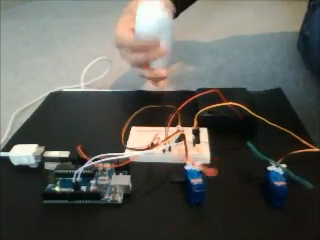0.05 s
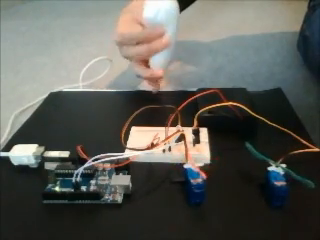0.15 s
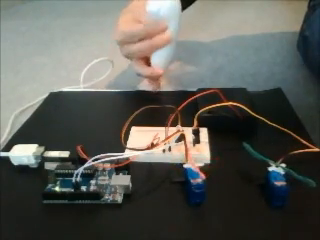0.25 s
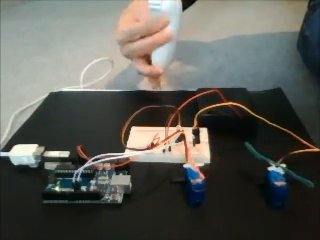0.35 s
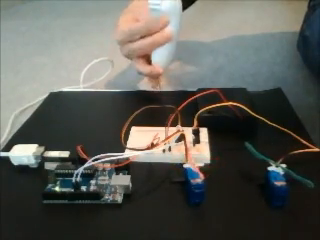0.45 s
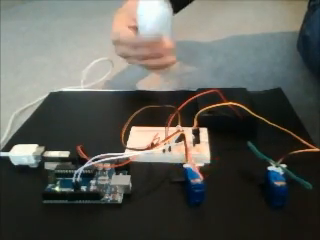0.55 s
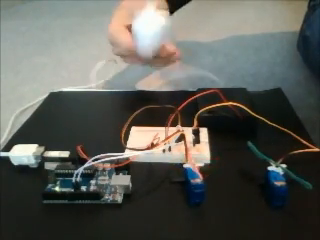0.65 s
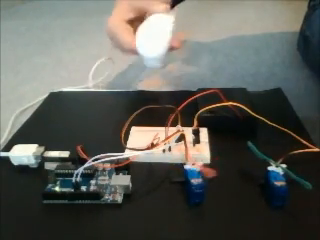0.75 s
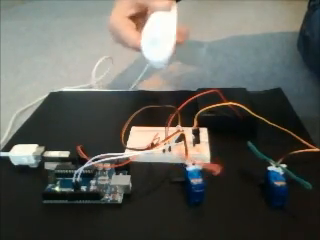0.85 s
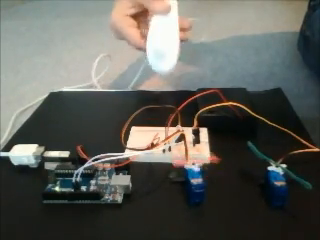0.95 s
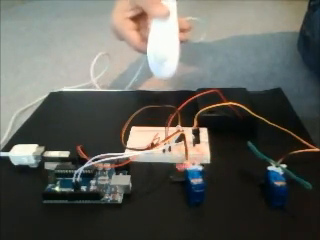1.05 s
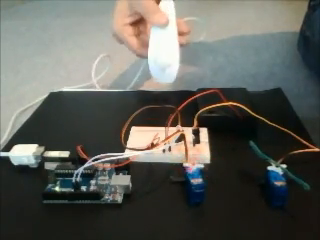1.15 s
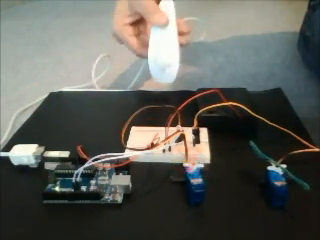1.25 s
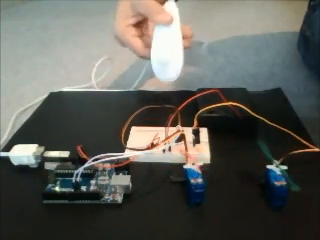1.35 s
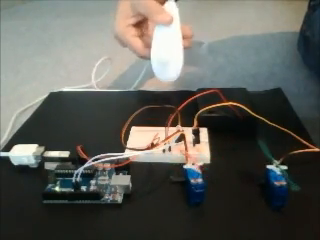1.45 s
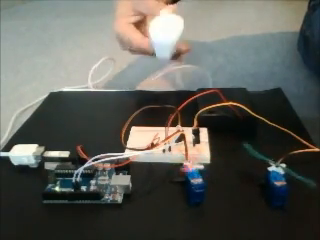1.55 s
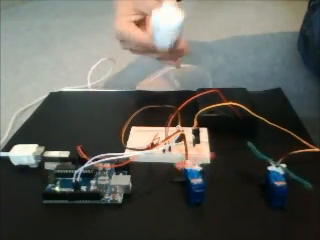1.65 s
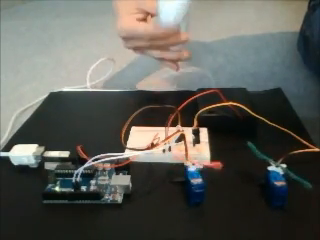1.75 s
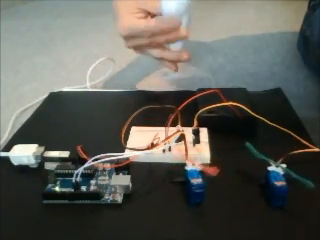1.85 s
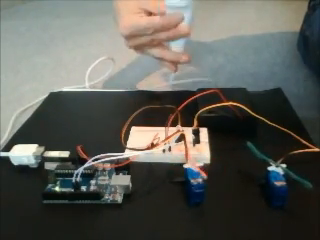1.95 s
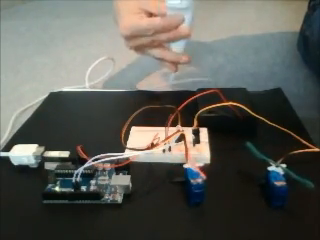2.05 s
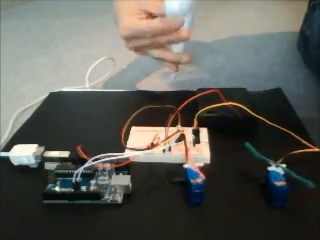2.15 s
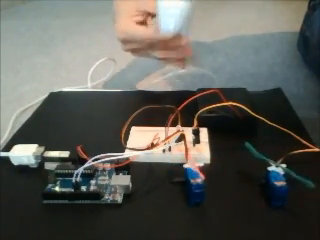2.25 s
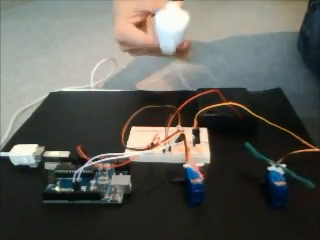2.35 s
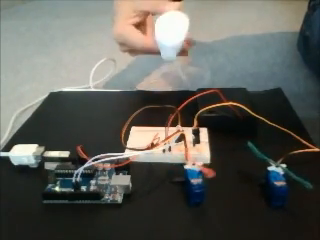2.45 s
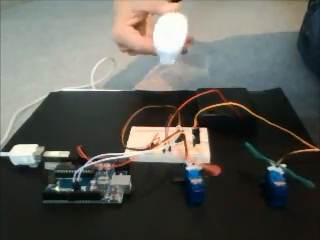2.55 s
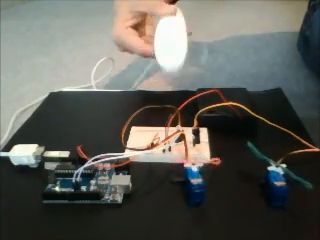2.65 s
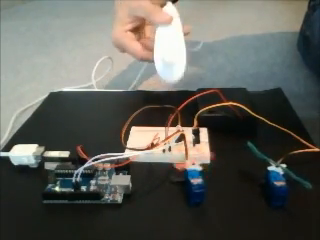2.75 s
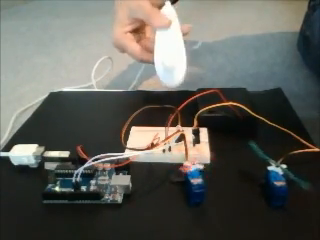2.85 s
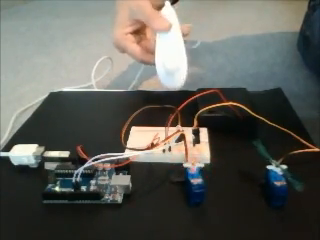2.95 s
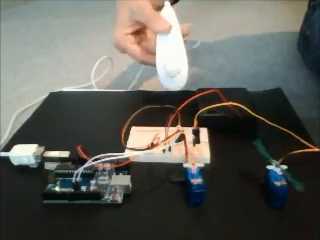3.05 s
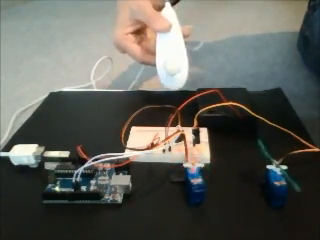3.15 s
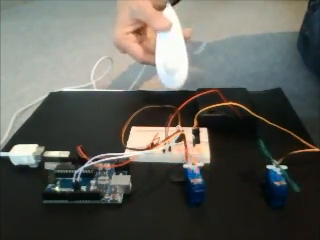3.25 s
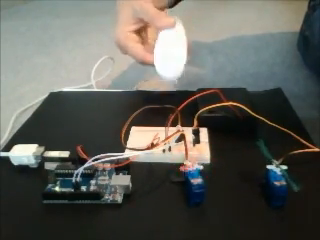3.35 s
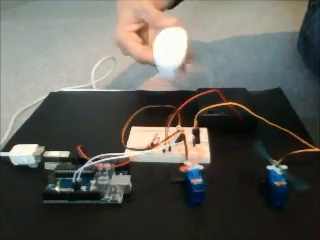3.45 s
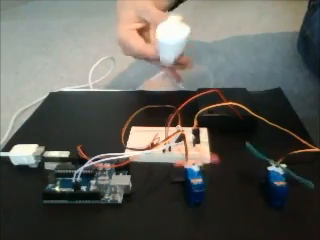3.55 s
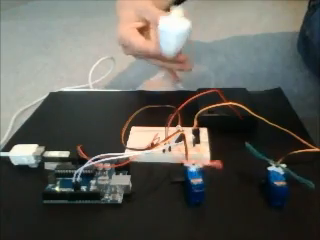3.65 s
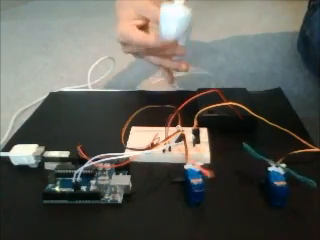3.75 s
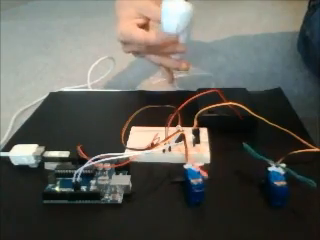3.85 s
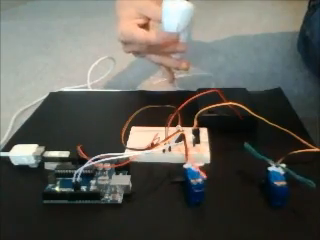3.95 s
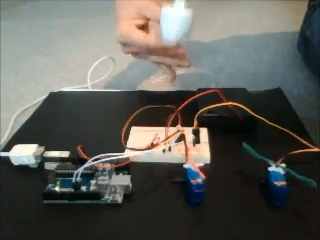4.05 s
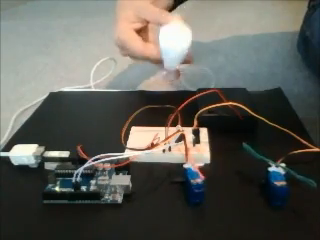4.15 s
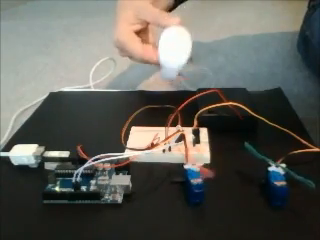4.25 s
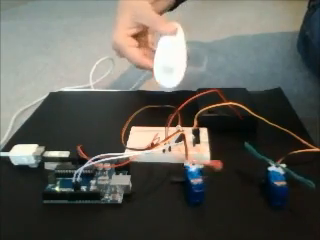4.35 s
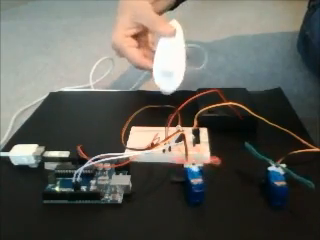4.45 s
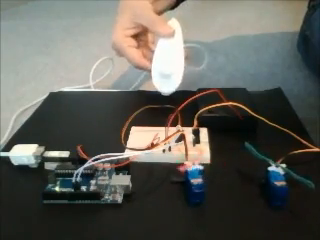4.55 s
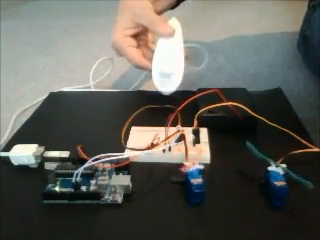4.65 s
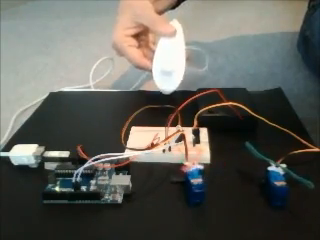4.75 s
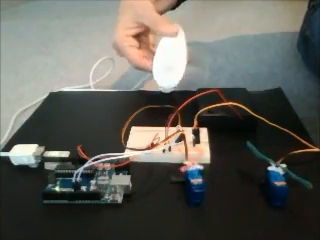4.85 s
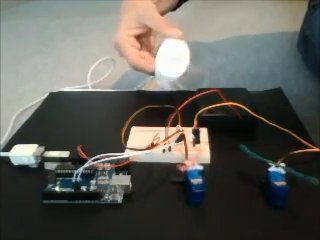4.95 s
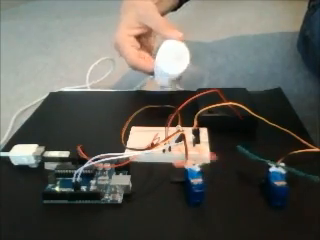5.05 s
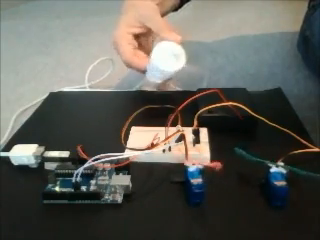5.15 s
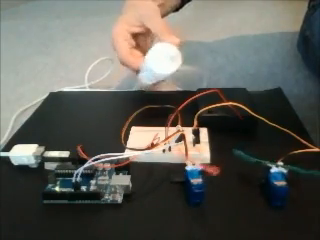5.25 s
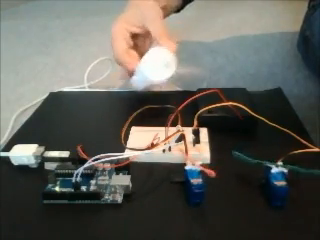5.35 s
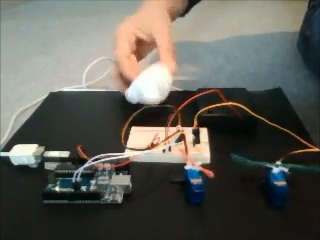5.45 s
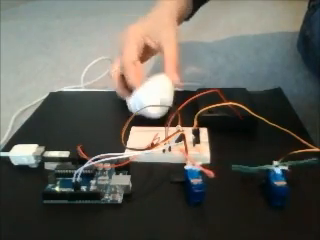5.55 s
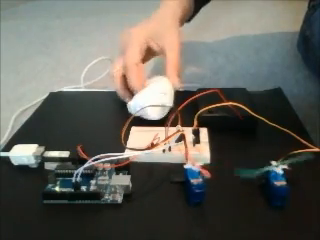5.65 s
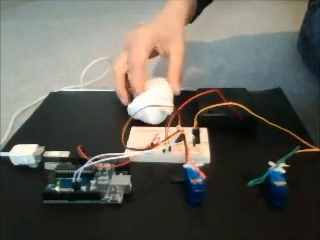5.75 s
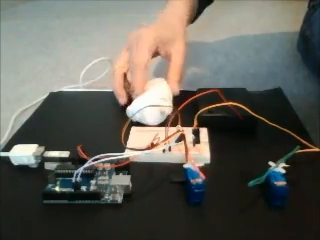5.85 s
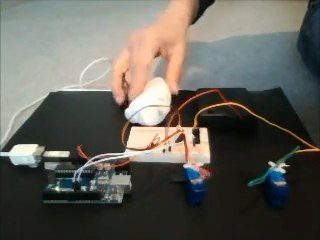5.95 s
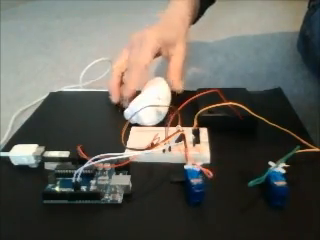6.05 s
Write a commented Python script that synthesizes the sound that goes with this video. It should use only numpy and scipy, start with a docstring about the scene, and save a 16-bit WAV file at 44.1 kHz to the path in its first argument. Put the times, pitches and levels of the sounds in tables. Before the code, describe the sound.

Close, high, buzzy whirs of a little servo swinging to and fro, with brief gear rattles and dry twitches from another.

```python
"""A hobby servo swings to and fro on a workbench: its gear teeth whine, scrape and knock, ringing the
plastic case near 7 kHz. The gears clack as they take up slack, growl near a stall and jolt under load.
A second servo twitches with a dry rasp, and a shaft squeaks faintly as it creeps to rest.
At rest both tick with the 50 Hz pulses of a hand-held controller.
All is heard in a small room, close to a narrow-band mono microphone."""
import sys
import numpy as np
from scipy import signal
from scipy.fft import rfft, irfft, next_fast_len
from scipy.io import wavfile
from scipy.ndimage import uniform_filter1d

SR = 44100
rng = np.random.default_rng(int(sys.argv[2]) if len(sys.argv) > 2 else 0)


def dump(signal):
    """Clip the signal to [-1, 1] and save it as 16-bit WAV at the path in sys.argv[1]."""
    limited = np.clip(np.atleast_2d(signal).T, -1, 1)
    pcm = np.round(limited * 32767).astype(np.int16)
    wavfile.write(sys.argv[1], SR, pcm)


N = 268569
TIME = np.arange(N) / SR
FULL_SPEED_HZ = 780  # tooth rate of the swinging servo

# swings of the first servo: start/s, drive time/s, run-down/s, top tooth rate/Hz, level/dB, gear load/dB
SWINGS = [ (-.054, 0.092, .05, 777, 0.5, 3), (.693, 0.31, 0.12, 774, 0.5, -0.5),
          (1.046, .03, .041, 660.3, 2, 1.5), (1.11, 0.033, .095, 686.5, 0, -1.1),
          (1.19, 0.069, 0.033, 551.3, -0.5, -0.5), (1.404, 0.047, 0.093, 588.3, 0, 1),
          (1.472, 0.36, 0.074, 778.2, -.5, 7), (2.345, .06, 0.095, 673, 1.5, -2.8),
          (2.432, 0.035, 0.099, 760, 1.3, -1), (2.491, 0.062, 0.092, 761.7, .5, -1),
          (2.567, .014, 0.093, 682.4, 0.8, 2.5), (2.652, 0.19, 0.066, 756, 1.2, -0.3),
          (2.862, .014, 0.061, 399.2, 1, 4.5), (3.006, .057, 0.06, 691.8, -2, 5),
          (3.084, 0.027, 0.091, 684.3, 2, -2), (3.153, 0.057, 0.049, 551, 0, -1),
          (3.223, .12, 0.063, 760, -0.66, 5.5), (3.378, 0.039, .087, 498.1, -0.5, 0),
          (3.437, .3, .046, 776.8, -0.62, 6.5), (4.175, .192, 0.065, 765.3, 0.8, -1.2),
          (4.391, 0.13, 0.064, 759.7, 0.65, -1.4), (4.586, 0.059, 0.081, 749, 1.1, -2),
          (4.684, .058, .068, 756, -0.5, 5.5), (4.815, .03, 0.048, 638.4, 2.2, -1.5),
          (4.894, .19, .024, 778, -.8, 8), (5.114, .096, .062, 782.3, -0.35, 6),
          (5.558, .034, 0.053, 618.7, 2, 2), (5.913, 0.059, 0.03, 536, -2.1, -1),
          (6.059, 0.022, 0.044, 649, 2, -4.5), ]
# resonances of the plastic case: f/Hz, width/Hz, level/dB
CASE_MODES = [(6100, 37, -22), (6616, 230, -4.5), (6714, 92, 1), (6917, 205, -1.5), (7144, 51, 1.5),
              (7340, 390, -3.5)]
# resonances of the gear train: f/Hz, width/Hz, level/dB
GEAR_MODES = [(920, 140, -18.5), (2105, 120, -12), (2760, 210, -8.5), (3906, 27, 3.5), (4420, 67, -1.5),
              (4630, 280, 10.5), (5434, 42, 10.5), (5480, 50, -3.5), (5790, 210, 2)]


def amp(db):
    """Decibels to gain."""
    return 10 ** (np.asarray(db) / 20)


def unit(x):
    """Scales to rms 1."""
    return x / np.sqrt(np.mean(x ** 2) + 1e-20)


def steady(x):
    """Scales to rms 1 over every 25 ms, keeping the fast flutter."""
    return x / np.sqrt(abs(uniform_filter1d(x ** 2, size=1100)) + 1e-12)


def curve_at(points, hz):
    """Reads a curve of (f/Hz, value) points on a log-frequency axis."""
    f, value = np.transpose(points)
    return np.interp(np.log(hz + 1), np.log(f), value)


def colour(x, points):
    """Equalises x with a curve of (f/Hz, level/dB) points."""
    size = next_fast_len(N + 8192)
    gain = amp(curve_at(points, np.fft.rfftfreq(size, 1 / SR)))
    return irfft(rfft(x, size) * gain, size)[:N]


def wander(hz):
    """Smooth random drift of rms 1, up to about this rate."""
    f = np.fft.rfftfreq(N, 1 / SR)[:4000]
    spectrum = rfft(rng.standard_normal(8000))[:4000] / (1 + (f / hz) ** 4)
    return unit(irfft(spectrum, next_fast_len(N))[:N])


def ring(x, modes):
    """Passes x through parallel resonances of alternating polarity."""
    return sum((-1) ** k * amp(db) * signal.lfilter(*signal.iirpeak(hz, hz / width, SR), x)
               for k, (hz, width, db) in enumerate(modes))


def after(start, length_s=0.25):
    """The samples that follow a start time, and the time since that start."""
    at = np.searchsorted(TIME, start)
    span = slice(at, at + int(length_s * SR))
    return span, TIME[span] - start


def impacts(cycles, spread_db, jitter_s):
    """One click a cycle, each of its own size and a little early or late."""
    at = np.flatnonzero(np.diff(np.floor(cycles)) > 0)
    size, late = rng.standard_normal((8000, 2))[:len(at)].T
    exact = at + (1 - cycles[at] % 1) / (cycles[at + 1] - cycles[at]) + late * jitter_s * SR
    taps = np.round(exact)[:, None].astype(int) + np.arange(-4, 5)
    clicks = amp(spread_db * np.clip(size, -2, 2))[:, None] * np.sinc(taps - exact[:, None])
    return np.bincount(np.clip(taps, 0, N - 1).ravel(), clicks.ravel(), N)


def scrape(cycles, spread_db, duty):
    """Each cycle sets off a burst of sliding friction that decays over a share (duty) of the cycle."""
    size = amp(spread_db * np.clip(rng.standard_normal(8000), -2, 1.5))
    envelope = size[np.floor(cycles).astype(int) % len(size)] * np.exp(-(cycles % 1) / duty)
    return unit(envelope * rng.standard_normal(N))


def motor():
    """Tooth rate, surge, level and load: the motor spins up while driven, then brakes evenly to rest."""
    spin_up_s, surge_peak_s = 0.0118, 0.016
    hz, surge = np.zeros((2, N))
    for start, driven, run_down, top_hz, _, load_db in SWINGS:
        span, t = after(start, length_s=0.5)
        lag_hz = (top_hz - hz[span.start]) * np.exp(-np.minimum(t, driven) / spin_up_s)
        hz[span] = (top_hz - lag_hz) * np.clip(1 - (t - driven) / run_down, 0, 1)
        surge[span] = amp(load_db) * (t / surge_peak_s * np.exp(1 - t / surge_peak_s)) ** 2
    # the drive lets go for an instant in mid-swing and the speed dips
    dips_s = [2.711, 2.805, 3.517, 3.657, 4.321, 5.051, 5.177]
    dip_depth, dip_half_s = 0.055, 0.009
    hz *= 1 - dip_depth * sum(np.clip(1 - abs(TIME - s) / dip_half_s, 0, 1) for s in dips_s)
    starts, *_, level_db, load_db = np.transpose(SWINGS)
    swing = np.maximum(np.searchsorted(starts, TIME, side="right") - 1, 0)
    return [hz] + [uniform_filter1d(c, size=260) for c in (surge, level_db[swing], load_db[swing])]


def engagement(hz):
    """The gears sound while driven, building up softly, and stop abruptly once braked to a stall."""
    stall_hz, engage_s = 387, 0.0042
    driven = np.any([(TIME >= start) & (TIME < start + length) for start, length, *_ in SWINGS], 0)
    turning = np.maximum(driven, 1 - 1 / (1 + (hz / stall_hz) ** 10))
    pole = np.exp(-1 / (engage_s * SR))
    build_up = signal.lfilter([1 - pole], [1, -pole], turning + 1e-9) ** 2
    return np.minimum(turning, build_up)


def swing_levels(tooth_hz, surge, level_db, load_db):
    """Speed, surge and load ride the levels of whine, case ring and rasp, in dB."""
    # each layer's response: level/dB, power of speed, dB per dB of load, surge/dB, unevenness/dB
    whine_law = (-31.5, 1.95, -0.2069, 0.95, -0.6)
    case_law = (-19.5, 0.81, 0.87, -0.97, -0.46)
    rasp_law = (-34.5, -0.08, 0.39, -0.5, 0.7)
    speed_db = 20 * np.log10(tooth_hz / FULL_SPEED_HZ)
    return [db + level_db + power * speed_db + per_load * load_db
            + surge_db * surge + uneven_db * wander(hz=30)
            for db, power, per_load, surge_db, uneven_db in (whine_law, case_law, rasp_law)]


def case_ring(teeth, speed, load, case_db):
    """Driven hard at full speed the teeth knock on the case in step; otherwise they rattle loosely."""
    knocks = unit(impacts(teeth, spread_db=1.5, jitter_s=13e-6) * load)
    chatter = scrape(teeth, spread_db=1.5, duty=0.3) * load
    in_step = np.clip(speed ** 6 * (0.4 + 0.07 * (case_db + 20)), 0.1, 0.85)
    strikes = np.sqrt(in_step) * 0.53 * knocks + np.sqrt(1 - in_step) * chatter
    treble_tilt = [(3000, -23.5), (5500, -6.5), (6200, -6), (7500, 0.5)]
    return steady(colour(ring(strikes, CASE_MODES), treble_tilt))


def gear_rasp(teeth, load):
    """Teeth slide over each other, and their friction rings the gear train."""
    # tone of the friction: f/Hz, level/dB
    rasp_eq = [(150, -36), (350, -16.5), (520, -40.5), (800, -16.5), (1250, -29.5), (1700, -28.5),
               (2200, -11), (2550, -20), (3000, -10), (3500, -11), (4600, -5), (5700, -8.5), (7000, -12),
               (8000, -15.5)]
    friction = scrape(teeth, spread_db=1, duty=0.94) * load
    ringing = colour(ring(friction, GEAR_MODES), [(6000, -2), (8000, -6)])
    return unit(colour(friction, rasp_eq) + amp(-5) * ringing)


def bench_shake():
    """The gearbox shakes the bench into a low, woolly drone."""
    # modes of the bench: f/Hz, width/Hz, level/dB
    bench_modes = [(240, 38, -11.5), (367.5, 21, 3), (625, 82, -3.5)]
    return unit(colour(ring(rng.standard_normal(N), bench_modes), [(600, -10), (1200, -14.5)]))


def gear_whine(teeth, tooth_hz, speed, load_db):
    """A tone near the tooth rate, with overtones that flare as they glide through gearbox resonances."""
    # how the gearbox passes the overtones: f/Hz, level/dB
    gearbox_eq = [(1200, -30), (1600, -31.5), (2100, -13), (2330, -15), (2560, -17), (2850, -11.5),
                  (3100, -9.5), (3450, -14.5), (3880, -17.5), (4250, -11), (4640, -5.5), (4950, -5),
                  (5450, -24), (5900, -18)]

    def partial(order):
        # below full speed the teeth rattle in their slack, which blurs the overtones
        slack = (order > 1) * np.clip(1.5 * (1 - speed), 0, 0.3) * wander(hz=220)
        return np.sqrt(2) * np.cos(2 * np.pi * (order * teeth + slack + rng.random()))

    overtones = np.zeros(N)
    for order in range(2, 8):
        odd_db = 0.47 * load_db * (order % 2)  # load brings out the odd partials
        db = curve_at(gearbox_eq, order * tooth_hz) + odd_db + 1.8 * wander(hz=151)
        overtones += amp(db) * partial(order)
    # the three rotor poles throb at a little under half the tooth rate
    throb = amp(-29.5 + 6.3 * wander(hz=34.8)) * partial(0.43)
    fundamental = amp(0.89 * wander(hz=125)) * partial(0.99)
    return fundamental + speed ** 0.29 * overtones + throb


def swinging_servo():
    """Meshing teeth whine, knock on the case and scrape; the gearbox shakes the bench."""
    teeth_per_turn, drift = 6, 0.002
    motor_hz, surge, level_db, load_db = motor()
    tooth_hz = np.maximum(motor_hz, 200) * (1 + drift * wander(hz=22.9))
    whine_db, case_db, rasp_db = swing_levels(tooth_hz, surge, level_db, load_db)
    speed = np.clip(tooth_hz / FULL_SPEED_HZ, 0.1, 1)
    flutter = 0.003 + 0.12 * (1 - speed)
    teeth = np.cumsum(tooth_hz * (1 + flutter * wander(hz=89.5))) / SR
    # the rotor is a little off centre, so the load pulses once and twice a turn
    turn = 2 * np.pi * teeth / teeth_per_turn
    load = amp(speed * (1.5 * np.sin(turn) + 0.58 * np.sin(2 * turn)) + wander(hz=60))
    case = amp(case_db) * case_ring(teeth, speed, load, case_db)
    rasp = amp(rasp_db - 3.82) * gear_rasp(teeth, load)
    shake = bench_shake()
    # the bench shakes most while the motor is slow and its torque is high
    shake_share = np.clip(0.0058 + 1.6 * (1 - speed) ** 2, 0, 1)
    whine = gear_whine(teeth, tooth_hz, speed, load_db)
    hum = amp(whine_db - 1.5) * (np.sqrt(1 - shake_share) * whine + np.sqrt(shake_share) * shake)
    return engagement(motor_hz) * (hum + case + rasp + amp(rasp_db - 27) * shake)


def holding_ticks():
    """Every control pulse gives each motor in turn a tiny kick."""
    # tone of the ticks: f/Hz, level/dB
    tick_eq = [(1000, -34), (3000, -34.5), (5500, -23.5), (6400, -19.5), (7000, -5.5), (7400, -7),
               (7800, -5)]
    # their fader curve: t/s, level/dB
    fader = [(0, 1), (.14, -42.5), (.35, -45.5), (.6, -48), (2.2, -46), (3.95, -45.5), (5.3, -50),
             (5.8, -42.5), (6.09, -34.5)]
    control_hz = 50
    pulses = TIME * control_hz
    first = scrape(pulses - 0.64, spread_db=4.5, duty=0.12)
    second = 1.3 * scrape(pulses - 0.77, spread_db=1.5, duty=0.32)
    return amp(np.interp(TIME, *np.transpose(fader))) * unit(colour(first + second, tick_eq))


def room_tone():
    """A low, steady wash."""
    # spectrum of the wash: f/Hz, level/dB
    wash_eq = [(35, -115), (60, -49), (136, -6.5), (201, -10), (234, -4.5), (429, -7.5), (473, -19),
               (698, -18), (934, -19), (1580, -22.5), (6300, -30), (8190, -58), (13900, -120)]
    return amp(-60.5) * unit(colour(rng.standard_normal(N), wash_eq))


def slack_clack():
    """A gear takes up its slack with one short blow of plastic on plastic."""
    # the blow: t/s, level/dB
    cues = [(0.033, -19.5)]
    # what it rings: f/Hz, width/Hz, level/dB
    clack_modes = [(1250, 75, -2), (1720, 1000, -11), (3010, 350, -3.5)]
    blow = np.zeros(N)
    for start, db in cues:
        blow[int(start * SR)] = amp(db)
    return amp(29) * ring(blow, clack_modes)


def stall_growls():
    """Near a stall the teeth pass one by one: a short, rough tone that swells and sags in pitch."""
    # growls: start/s, length/s, tooth rate at mid-growl/Hz, level/dB
    cues = [ (0.04, 0.047, 275.4, -37.5), (1.161, 0.048, 335, -45.5), (1.858, .025, 355, -34),
            (2.86, 0.038, 345.3, -38), (3.356, 0.019, 339, -32.5), (3.743, 0.034, 340, -34.5),
            (5.258, 0.026, 318, -42), (5.398, .05, 281, -42.5), (5.474, .034, 305, -45),
            (5.584, .04, 302, -39.5), (5.915, 0.02, 303, -38.5), ]
    sag_per_s, roughness, octave_db = 5.7, 0.11, -12.5
    jitter = 1 + roughness * wander(hz=116)
    growls = np.zeros(N)
    for start, length, hz, db in cues:
        span = (TIME >= start) & (TIME < start + length)
        t = TIME[span] - start
        tooth_hz = hz * jitter[span] * np.exp(-sag_per_s * (t - length / 2))
        phase = 2 * np.pi * np.cumsum(tooth_hz) / SR
        tone = unit(np.sin(phase) + amp(octave_db) * np.sin(2 * phase))
        growls[span] += amp(db) * np.sin(np.pi * t / length) * tone
    return growls


def twitch_envelope():
    """Each twitch swells quickly, holds while driven and dies away."""
    # twitches of the second servo: start/s, drive time/s, level/dB
    cues = [ (.168, .018, -45.5), (.25, 0.011, -33.5), (0.388, 0.019, -35), (1.2, 0.055, -38.5),
            (1.27, 0.033, -29), (1.329, 0.04, -32.5), (1.42, .11, -28.5), (1.908, .021, -37.5),
            (1.988, 0.031, -48.5), (2.064, 0.0061, -52.5), (2.904, 0.013, -35), (2.927, 0.067, -37),
            (3.03, 0.052, -36.5), (3.24, .1, -29.5), (3.379, 0.061, -30.5), (3.79, .05, -47),
            (3.873, 0.022, -46.5), (4.011, 0.036, -44.5), (4.091, 0.021, -36.5), (4.906, .025, -31),
            (5.262, 0.014, -40.5), (5.332, 0.026, -45.5), (5.399, 0.044, -31.5), (5.474, .032, -36),
            (5.603, 0.098, -32), (5.735, 0.1, -57.5), ]
    attack_s, release_s = 0.0033, 0.009
    envelope = np.zeros(N)
    for start, driven, db in cues:
        span, t = after(start)
        swell = np.exp(np.minimum(t / attack_s - 2, 0))
        envelope[span] += amp(db) * swell * np.exp(-np.maximum(t - driven, 0) / release_s)
    return uniform_filter1d(envelope, size=150)


def twitching_servo():
    """Slow, uneven gears scrape through their backlash and ring the case and blade."""
    # tone of the dry rasp: f/Hz, level/dB
    rasp_eq = [(150, -39.5), (300, -19.5), (600, -27.5), (800, -43.5), (1700, -40), (2300, -26.5),
               (3300, -21), (4200, -24.5), (5000, -11.5), (5700, -9), (6300, -10), (7400, 0), (7900, -11)]
    # resonances of this servo and the blade on its shaft: f/Hz, width/Hz, level/dB
    blade_modes = [(1025, 55, -10.5), (2460, 91, -16), (3280, 33, -17.5), (3970, 94, 0.5),
                   (4200, 150, -7.5), (4536, 99, 3.5), (5380, 100, 3.5), (5820, 110, 4), (5745, 115, 5),
                   (6330, 37, 10.5), (7130, 24, -1.5), (7600, 80, -1.5)]
    tooth_hz = 310 * amp(1.8 * wander(hz=37.84))
    friction = twitch_envelope() * scrape(np.cumsum(tooth_hz) / SR, spread_db=1.5, duty=0.5)
    ringing = colour(ring(friction, blade_modes), [(7000, -3.5), (9000, -20.5)])
    return amp(17) * colour(friction, rasp_eq) + amp(11.5) * ringing


def gear_jolts():
    """The gears catch under load: a brief rattle rings the case and the gear train."""
    # jolts: t/s, level/dB
    cues = [(1.052, -20.5), (1.117, -25.5), (1.234, -23.5), (1.412, -20.5), (1.49, -17), (2.566, -23),
            (3.018, -29), (3.06, -22.5), (3.166, -22.5), (3.25, -15.5), (3.32, -14), (4.6, -24.5),
            (4.761, -25.5), (4.912, -28)]
    attack_s, decay_s, rattle_hz = 0.002, 0.012, 480
    envelope = np.zeros(N)
    for start, db in cues:
        span, t = after(start)
        envelope[span] += amp(db) * np.minimum(t / attack_s, 1) * np.exp(-t / decay_s)
    rattle = scrape(TIME * rattle_hz, spread_db=10, duty=0.44)
    return envelope * (steady(ring(rattle, CASE_MODES)) + amp(-14) * steady(ring(rattle, GEAR_MODES)))


def shaft_squeaks():
    """A shaft creeps to rest: faint swells of friction in two narrow resonances."""
    # squeaks: start/s, length/s, level/dB
    cues = [(1.925, .06, -56.5), (3.815, 0.059, -57), (5.345, 0.065, -57), (5.71, 0.043, -51),
            (5.765, 0.046, -58.5)]
    # their ring: f/Hz, width/Hz, level/dB
    squeak_modes = [(3580, 57, 0.25), (3870, 39, 3.5)]
    swells = sum(amp(db) * np.sin(np.pi * np.clip((TIME - start) / length, 0, 1))
                 for start, length, db in cues)
    return swells * unit(ring(rng.standard_normal(N), squeak_modes))


def reverb(x, wet_db):
    """The room's faint tail, each band dying at its own speed."""
    # decay of the room: f/Hz, time to fall 60 dB/s
    decay_times = [(300, 0.037), (2000, 0.31), (3900, 0.35), (5000, 0.18), (7000, 0.19)]
    noise = rng.standard_normal(SR // 2) * (TIME[:SR // 2] > 0.003)  # 3 ms pre-delay
    hz, t, bands = signal.stft(noise, SR, nperseg=256)
    decay = amp(-60 * t / curve_at(decay_times, hz)[:, None])
    tail = signal.istft(bands * decay, SR, nperseg=256)[1]
    return amp(wet_db) * signal.fftconvolve(x, tail / np.linalg.norm(tail))[:N]


def scene():
    """Both servos in a small room, the same in both channels."""
    near = swinging_servo() + stall_growls() + gear_jolts() + holding_ticks() + slack_clack()
    far = twitching_servo() + shaft_squeaks()
    mono = near + far + reverb(near, wet_db=-16.5) + reverb(far, wet_db=-14.5) + room_tone()
    return np.array([mono, mono])


def record(dry):
    """The microphone cuts the bass and rolls off steeply above 7.5 kHz."""
    mic_eq = [(90, -28.5), (105, -18.5), (135, 0.5), (7480, 1),
              (7750, -22), (8000, -33), (8250, -43.5), (8400, -46.5)]
    heard = np.tile(colour(dry.mean(0), mic_eq), (2, 1))
    low_pass = signal.firwin(511, cutoff=8500, window=("kaiser", 9), fs=SR)
    return signal.oaconvolve(heard, low_pass[None], "same")


dry = scene()
out = record(dry)
dump(out)
```